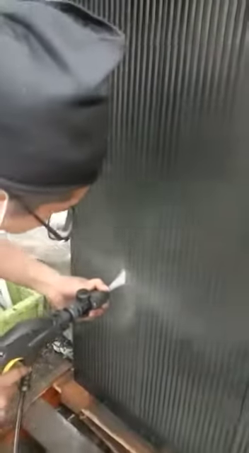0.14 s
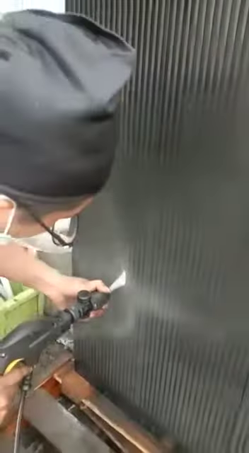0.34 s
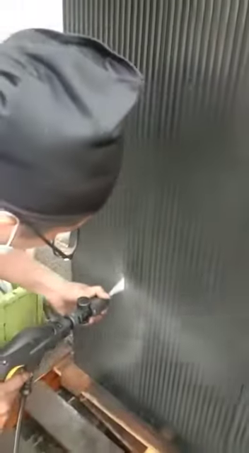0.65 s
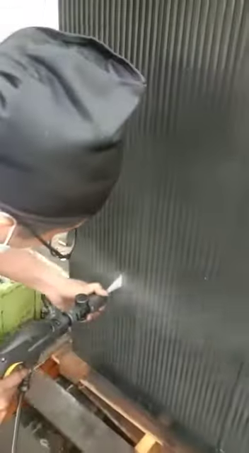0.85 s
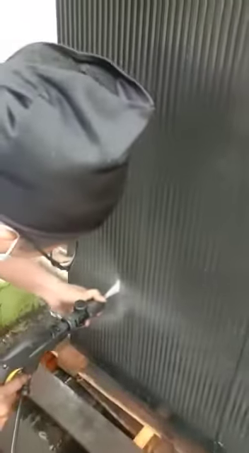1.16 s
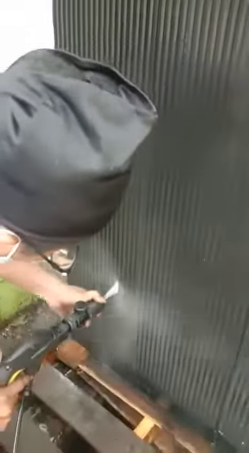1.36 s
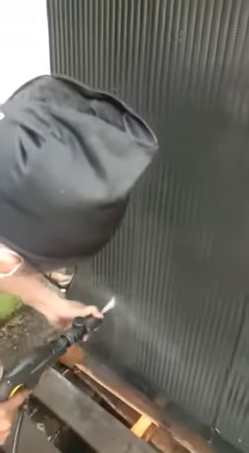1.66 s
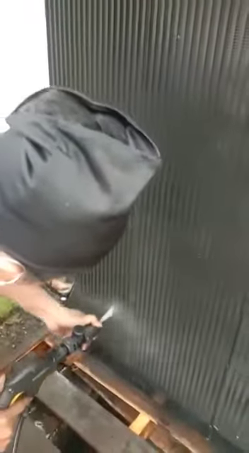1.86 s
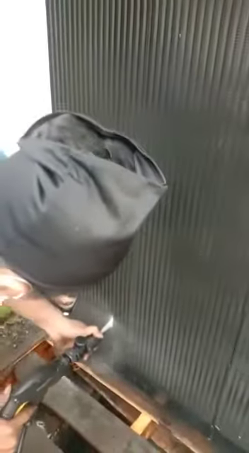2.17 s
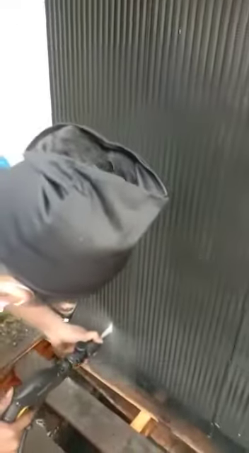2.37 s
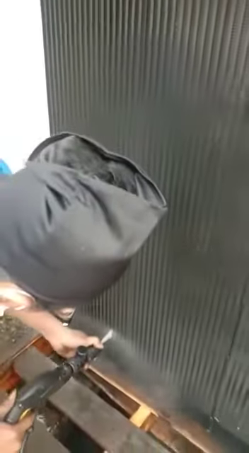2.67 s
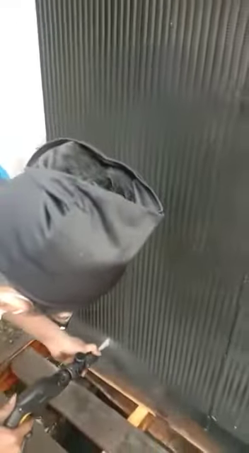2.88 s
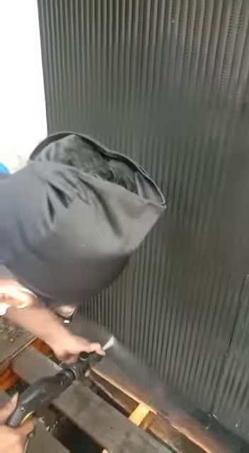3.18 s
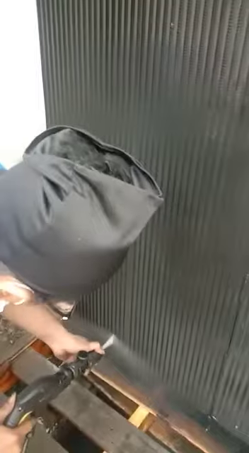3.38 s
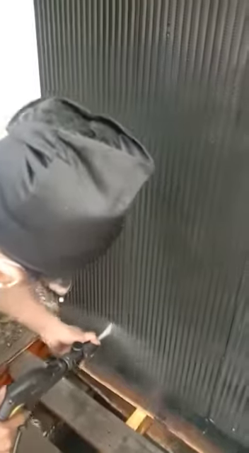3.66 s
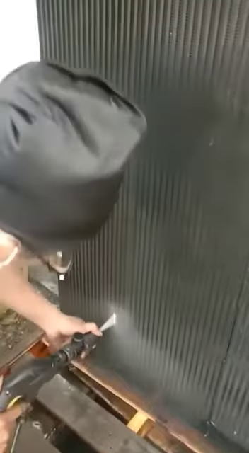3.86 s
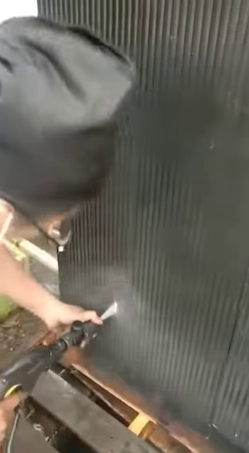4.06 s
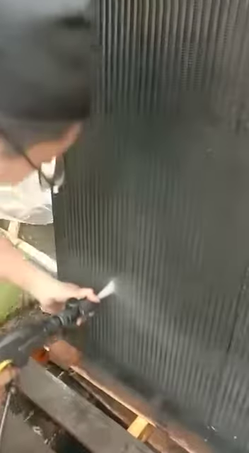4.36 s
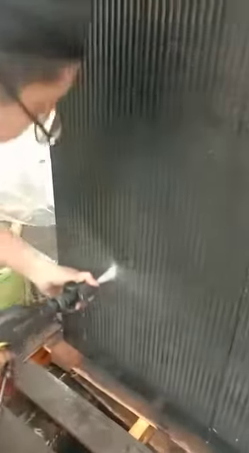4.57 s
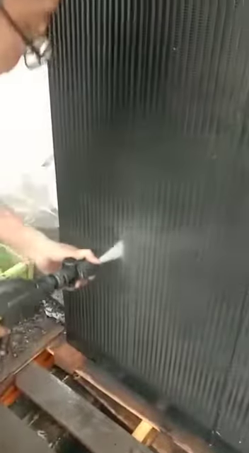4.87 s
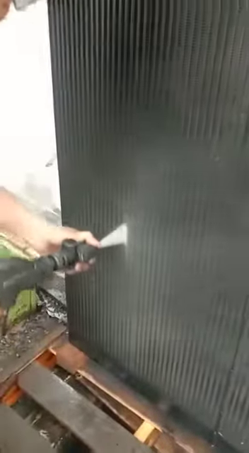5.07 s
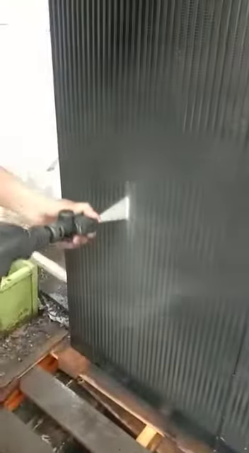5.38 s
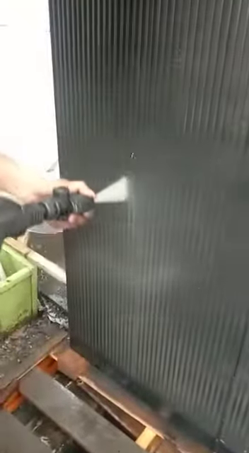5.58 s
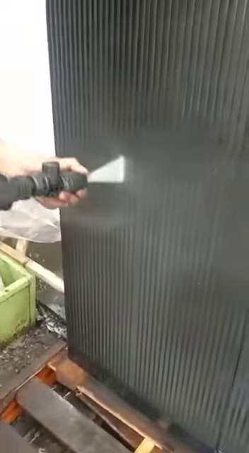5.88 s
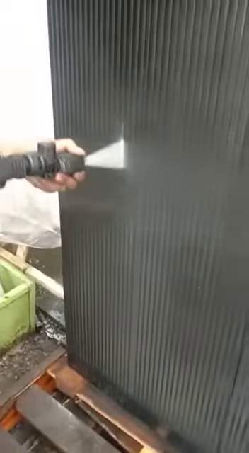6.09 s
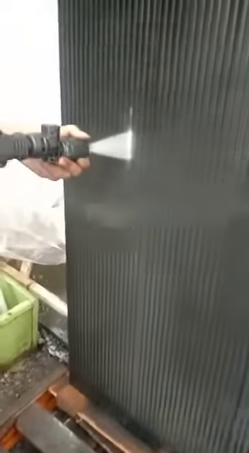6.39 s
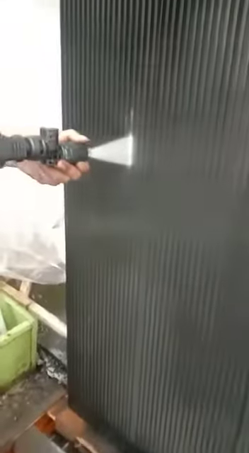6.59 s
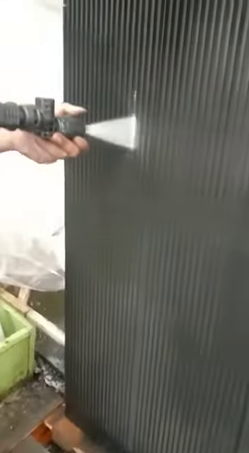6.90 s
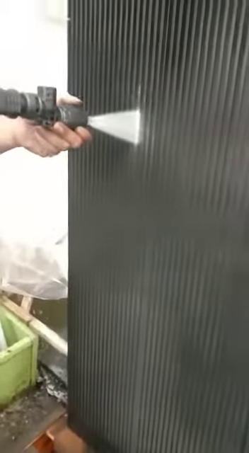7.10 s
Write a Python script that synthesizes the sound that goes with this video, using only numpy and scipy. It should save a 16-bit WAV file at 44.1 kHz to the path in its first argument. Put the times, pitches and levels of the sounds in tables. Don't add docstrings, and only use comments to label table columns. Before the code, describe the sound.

A pressure washer is already running at full force from 0 s, its fan of water striking a ridged metal cooler core close to a phone microphone. The sound is a dense, constant roar with splashing mids and a fine, sputtery fizz on top, ending abruptly in its upper range. From 0 to 3 s the jet sweeps downward; bands in the noise slide and a hollow, blown-pipe tone around the low treble gradually weakens, thinnest near 3 s. A soft deep thump comes at about 3.2 s. From 4 s the nozzle rises, the tone returns, and between 4.7 and 6 s a hollow notch glides upward through the hiss. Knocking air thumps hit at 5.2 and 5.35 s. From 6 to 7.2 s the pipe resonances sing more clearly, with low gusts near 6.8 s. Quiet motor hum and workshop rumble sit underneath throughout; the spray continues to the cut.

```python
import sys
import numpy as np
from scipy import signal
from scipy.fft import rfft, irfft
from scipy.io import wavfile
from scipy.ndimage import uniform_filter1d

SR = 44100
rng = np.random.default_rng(int(sys.argv[2]) if len(sys.argv) > 2 else 0)


def volts(x):
    e = np.asarray(x, float) / 20
    return 10 ** e


def generate_wav(sig):
    pcm = np.round(np.clip(np.atleast_2d(sig).T, -1, 1) * 32767).astype(np.int16)
    wavfile.write(sys.argv[1], SR, pcm)


N = 319284


def evened(x):
    return x / np.sqrt(np.mean(x ** 2) + 1e-20)


def played(table):
    start_s, *columns = np.transpose(table)
    return [np.interp(np.arange(N) / SR, start_s, column) for column in columns]


def coloured(gains):
    return evened(irfft(rfft(rng.standard_normal(N)) * gains, N))


def hiss(points):
    hz, db = np.transpose(points)
    log_hz = np.log(np.fft.rfftfreq(N, 1 / SR) + 1)
    return coloured(volts(np.interp(log_hz, np.log(hz), db, left=-120, right=-120)))


def sung(modes):
    f = np.fft.rfftfreq(N, 1 / SR)
    power = 0
    for pitch_hz, width_hz, level_db in modes:
        gain = volts(level_db) / (1 + (2 * (f - pitch_hz) / width_hz) ** 2)
        power = power + gain ** 2
    return coloured(np.sqrt(power))


def resonate(x, pitch_hz, width_hz):
    turn = np.exp(2j * np.pi * np.cumsum(pitch_hz * np.ones(N)) / SR)
    r = np.exp(-np.pi * width_hz / SR)
    return 2 * (turn * signal.lfilter([1 - r], [1, -r], x / turn)).real


def wander(per_s):
    hop = 256
    hold = np.exp(-2 * np.pi * per_s * hop / SR)
    steps = signal.lfilter([1], [1, -hold], rng.standard_normal(N // hop + 2))
    return np.interp(np.arange(N) / hop, np.arange(len(steps)), evened(steps))


# start_s, square_aim_db, open_length_db, main_pipe_hz
AIM = [(0, -29, -38, 1266), (.3, -33, -38, 1267), (.75, -32, -40, 1233), (1.2, -31.5, -38, 1288),
       (1.6, -34, -38, 1280), (1.95, -34.5, -38.5, 1250), (2.25, -30.5, -40.5, 1240),
       (2.68, -34.5, -39, 1230), (3.05, -42, -37, 1296), (3.6, -34, -43.5, 1250), (4.2, -31.5, -39, 1250),
       (4.55, -25.5, -38, 1284), (4.78, -31.5, -35, 1308), (5.4, -29.5, -35, 1280), (5.75, -27, -31, 1262),
       (6.0, -29.5, -31.5, 1251), (6.7, -25.5, -28.5, 1277), (7.24, -30.5, -26.5, 1277)]
# start_s, edge_strike_db, clear_sight_db (past the worker), fan_pressure_db
NOZZLE = [(0.0, -26.5, -35.5, -26), (0.4, -26, -34, -24), (0.97, -27, -32, -27), (1.01, -25.5, -32, -28),
          (1.27, -26, -29.5, -25.5), (1.41, -25, -29, -25), (1.43, -26.5, -31, -27),
          (2.22, -27.5, -27.5, -26), (3.63, -28, -27.5, -27.5), (3.79, -25.5, -28.5, -25),
          (4.09, -25.5, -28.5, -25), (4.38, -27.5, -30.5, -27), (4.86, -24.5, -32.5, -23.5),
          (5.34, -26.5, -31.5, -22.5), (5.79, -25, -33, -26), (6.63, -25, -34.5, -28.5),
          (7.22, -25, -37.5, -27.5), (7.24, -20, -36, -27)]


def controls():
    rest_db = np.array([[-30, -33, -27, -30, -26]]).T
    return np.array(played(AIM)[:2] + played(NOZZLE)) - rest_db


# pitch_hz, level_db_per_hz
EDGES = [(1200, -36), (1600, -4), (1900, -0.5), (2300, 3.5), (2750, -1), (3050, -7.5), (3500, -48)]
# pitch_hz, level_db_per_hz
UPPER = [(2800, -44), (3200, -0.5), (3450, 0), (4000, 0), (4600, 0), (4950, -9), (5400, -34)]


def roar():
    aim, opening, strike, sight, fan = controls()
    edges_db = -28.5 + 1.07 * strike
    upper_db = -29 + 0.1 * strike + 0.83 * sight + 0.53 * opening
    lurch_db = 1.13 * wander(per_s=0.83)
    return volts(edges_db) * hiss(EDGES) + volts(upper_db + lurch_db) * hiss(UPPER)


# pitch_hz, level_db_per_hz
BODY = [(120, -39), (200, -11), (472, -15), (720, -9), (986, -11.5), (1240, -7.5), (1400, -3.5),
        (1770, -7.5), (2230, -17.5), (3140, -6), (3450, -9), (4860, -11.5), (5200, -4.5), (6760, -50),
        (11400, -120)]
# pitch_hz, level_db_per_hz
SPLASH = [(2760, -12), (4700, -8.5), (4970, -13.5), (5620, 1.5), (6220, -3.5), (6800, 1.5), (7350, -3),
          (8050, -16), (8600, -11), (11200, -24), (18900, -120)]
# pitch_hz, level_db_per_hz
MIST = [(7900, -60), (8200, -33), (8800, 1), (10000, 4.5), (11000, 7.5), (12500, 3), (13800, 4),
        (14500, -7), (15500, -30)]
# pitch_hz, level_db_per_hz
FIZZ = [(7350, -57), (12500, -4.5), (13500, -14), (14200, 2), (14620, 4.5), (15100, 4), (15500, 2),
        (15900, -7)]
# start_s, pitch_hz, depth_0_to_1
CANCEL = [
    (4.3, 9850, .0),
    (4.7, 10800, 0.2),
    (5.2, 12100, 0.46),
    (5.6, 13100, 0.7),
    (6.0, 14300, 0.36),
    (6.4, 15200, 0.1),
    (6.8, 15400, 0.1),
]


def spray():
    aim, opening, strike, sight, fan = controls()
    sputter = volts(0.5 * wander(per_s=12))
    mist = volts(-29 + 0.78 * sight) * hiss(MIST)
    fizz = volts(-23.5 + 1.1 * fan) * sputter * hiss(FIZZ)
    fine = mist + fizz
    notch_hz, depth = played(CANCEL)
    fine = fine - np.clip(depth, 0, .52) * resonate(fine, notch_hz, width_hz=3200)
    body = volts(-28 + .15 * opening) * hiss(BODY)
    splash = volts(-26 + 0.11 * sight + 0.37 * wander(per_s=8)) * hiss(SPLASH)
    return body + splash + fine


# start_s, length_s, middle_hz, level_db
RIDGES = [(0, .45, 2250, 4), (0, .95, 2000, 5), (.1, .7, 2650, 4), (.6, .45, 3150, -5), (0, 1.5, 1680, 3),
          (1., .55, 2640, 9), (1., .5, 2380, 4), (1.55, .6, 3480, 4), (1.75, .9, 2830, 4),
          (1.75, .7, 1750, -5), (2.6, 1.15, 2680, -6), (1.9, 1.8, 3230, -5), (2.8, .35, 3700, 6),
          (2.7, .7, 1500, 4), (3.1, .45, 4420, 4), (3.75, .57, 2830, 8), (3.7, .75, 4100, 6),
          (3.75, .3, 3500, 6), (3.7, .5, 2330, 6), (4.05, .27, 2020, 7), (4.3, .75, 3020, -7),
          (4.62, .68, 2550, 7), (4.6, .6, 2000, 5), (4.35, 1.1, 1700, 5), (4.9, .9, 3650, -3),
          (5.4, .6, 4150, -5), (5.6, .7, 1950, 6), (5.8, .75, 1615, 6), (6.3, 1., 2740, 3),
          (6.2, 1.2, 2220, 3)]
# start_s, detour_m
DETOUR = [(0, .3), (1.1, .292), (3.65, .29), (4.4, .318), (5.2, .347), (5.7, .36), (7.24, .355)]


def patchy(x, wide_db, fine_db):
    hz, t, z = signal.stft(x, SR, nperseg=1024, noverlap=768)
    wide, fine = rng.standard_normal((2, len(t), len(hz)))
    wide = evened(uniform_filter1d(uniform_filter1d(wide, size=40, axis=0), size=8, axis=1))
    fine = evened(uniform_filter1d(uniform_filter1d(fine, size=50, axis=0), size=2, axis=1))
    field_db = wide_db * wide + fine_db * fine
    when_s, detour_m = np.transpose(DETOUR)
    detour_now_m = np.interp(t, when_s, detour_m)[:, None]
    low = slice(0, 128)
    for start_s, length_s, middle_hz, level_db in RIDGES:
        progress = np.clip((t[:, None] - start_s) / length_s, 0, 1)
        swell = np.sin(np.pi * progress).clip(0) ** .33
        centre_hz = middle_hz * np.interp(start_s + length_s / 2, when_s, detour_m) / detour_now_m
        ridge = np.exp(-.5 * ((hz[low] / centre_hz - 1) / .036) ** 2)
        field_db[:, low] += level_db * swell * ridge
    return signal.istft(z * volts(field_db).T, SR, nperseg=1024, noverlap=768)[1][:N]


# pitch_hz, width_hz, level_db
LOW_PIPES = [(647, 81, 0.5), (754, 42, -0.5), (865, 136, 2.5)]
# pitch_hz, width_hz, level_db
SIDE_PIPE = [(1159, 175, 0)]


def pipes():
    aim, opening, strike = controls()[:3]
    main_hz, width_hz = played(AIM)[2], 70
    main = resonate(rng.standard_normal(N), main_hz, width_hz)
    main = evened(resonate(main, main_hz, width_hz))
    power = uniform_filter1d(main ** 2, size=600)
    main = evened(main / (power + .05) ** .14)
    flicker_db = 1.5 * wander(per_s=9)
    low = volts(-36.5 + 1.46 * opening + .2 * aim) * sung(LOW_PIPES)
    side = volts(-36.5 + 0.8 * aim + 0.93 * strike) * sung(SIDE_PIPE)
    return low + side + volts(-29.5 + 1.51 * aim + flicker_db) * main


# start_s (peak), level_db, length_s
GUSTS = [(0.0, -46, 0.089), (.67, -44, 0.14), (1.01, -53, 0.045), (1.176, -45, 0.052), (1.68, -49, .15),
         (2.0, -56, 0.1), (2.22, -54, .04), (2.44, -47, .05), (2.78, -48, .1), (3.02, -54, .05),
         (3.25, -45, 0.068), (3.55, -43, 0.045), (4.87, -42, 0.046), (5.06, -55, .04), (5.2, -44, 0.04),
         (5.35, -41, .06), (5.716, -47, .06), (5.85, -52, 0.027), (5.98, -44, .12), (6.46, -53, .06),
         (6.76, -39, 0.056), (6.93, -43, .08), (7.18, -49, 0.036)]
# pitch_hz, level_db_per_hz
GUST = [(20, -30), (40, -20), (60, -5.5), (90, 3.5), (130, -0.5), (220, -13.5), (350, -6.5), (500, -43)]
# start_s (peak), level_db, pitch_hz, length_s
PUFFS = [
    (3.2172, -22, 88, .008),
    (3.297, -31, 110, .006),
    (5.187, -22.5, 150, .006),
    (5.2037, -17.5, 370, .0028),
    (5.2105, -24, 130, .006),
    (5.2225, -22, 150, .006),
    (5.352, -22, 140, .006),
    (5.370, -16.5, 165, .006),
    (5.378, -23, 270, .006),
    (5.392, -22, 110, .006),
]


def air():
    now, t = np.arange(N) / SR, np.arange(-2000, 2000) / SR
    push = volts(-59)
    for start_s, level_db, length_s in GUSTS:
        push = push + volts(level_db) * np.exp(-.5 * ((now - start_s) / length_s) ** 2)
    out = push * hiss(GUST)
    for start_s, level_db, pitch_hz, length_s in PUFFS:
        side_s = np.where(t < 0, .55 * length_s, length_s)
        swing = np.exp(-.5 * (t / side_s) ** 2)
        out[round(start_s * SR) - 2000:][:4000] += volts(level_db) * swing * np.cos(2 * np.pi * pitch_hz * t)
    return out


# shaft_multiple, level_db (rms)
PUMP = [(2, -70), (3, -38), (4, -52), (5, -55)]
# shaft_multiple, level_db (rms)
FAN = [(3, -48), (3.6, -47), (6, -52), (9, -62), (10, -63), (15, -47.5), (16, -46), (17, -50), (18, -54),
       (19, -55), (24, -53)]
# pitch_hz, level_db_per_hz
RUMBLE = [(15, -63), (25, -28), (86, -10.5), (117, -12), (145, -2), (167, -2.5), (216, -3.5), (320, -19),
          (420, -42), (700, -120)]


def motors():
    t = np.arange(N) / SR
    out = volts(-44) * hiss(RUMBLE)
    for shaft_hz, orders in ((48.88, PUMP), (45.45, FAN)):
        for multiple, level_db in orders:
            peak = volts(level_db + 3 + .9 * wander(per_s=1.5))
            out += peak * np.sin(2 * np.pi * (multiple * shaft_hz * t + rng.random()))
    return out


# count, lowest_hz, highest_hz, width_hz, level_db
SPLIT_KINDS = [(26, 4100, 13600, 1700, -32), (10, 10, 250, 200, -59)]


def splits():
    size = 2048
    out, f = np.zeros(N + size), np.fft.rfftfreq(size, 1 / SR)
    for count, lowest_hz, highest_hz, width_hz, level_db in SPLIT_KINDS:
        for when, where, strength in rng.random((count, 3)):
            low_hz = lowest_hz + where * (highest_hz - lowest_hz)
            band = (f > low_hz) * (f < low_hz + width_hz)
            burst = evened(irfft(rfft(rng.standard_normal(size)) * band, size))
            level = volts(level_db + 3.5 * (2 * strength - 1))
            out[int(when * N):][:size] += level * burst * signal.windows.gaussian(size, 330)
    return out[1024:N + 1024]


def scene():
    jet = patchy(roar() + spray(), wide_db=.9, fine_db=1.5)
    mono = jet + pipes() + air() + motors()
    return np.array([mono, mono])


def top_cut(x):
    return signal.sosfilt(signal.butter(12, 16850, fs=SR, output="sos"), x)


def record(dry):
    edge_hz = 15490
    mix = dry + np.outer([1, -1], splits())
    lowpass = signal.firwin(2047, edge_hz, window=("kaiser", 10), fs=SR)
    mix = signal.oaconvolve(mix, lowpass[None], "same")
    return top_cut(mix)


dry = scene()
out = record(dry)
generate_wav(out)
```